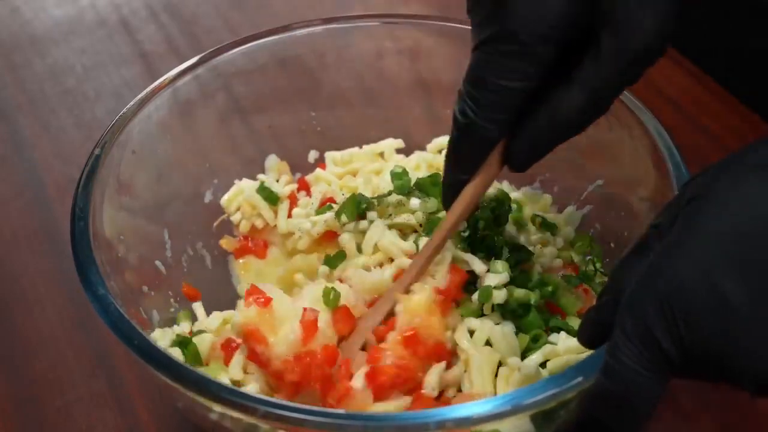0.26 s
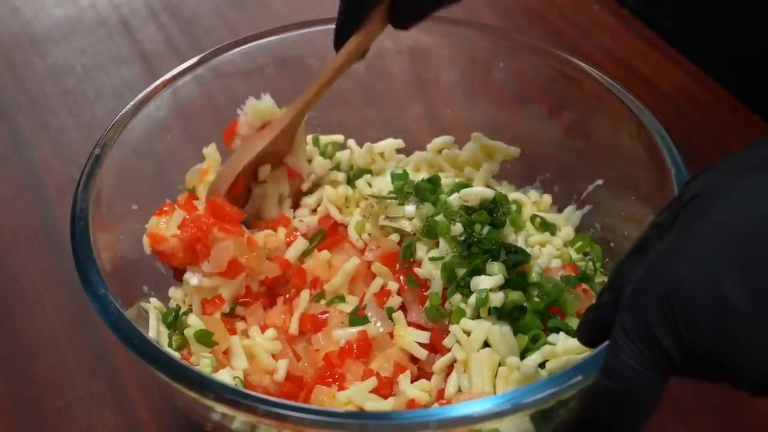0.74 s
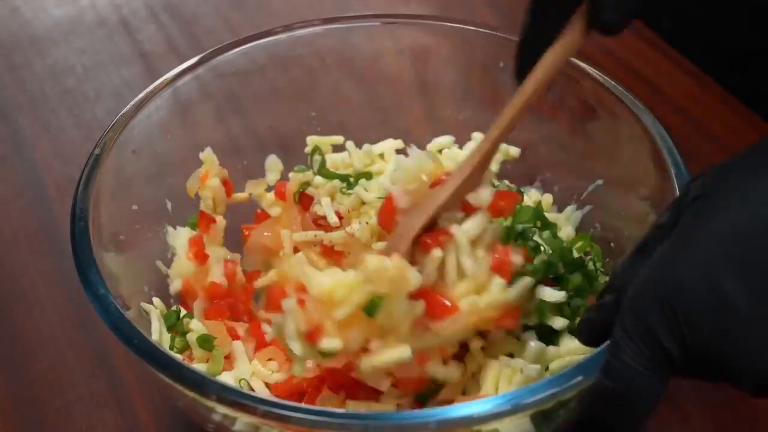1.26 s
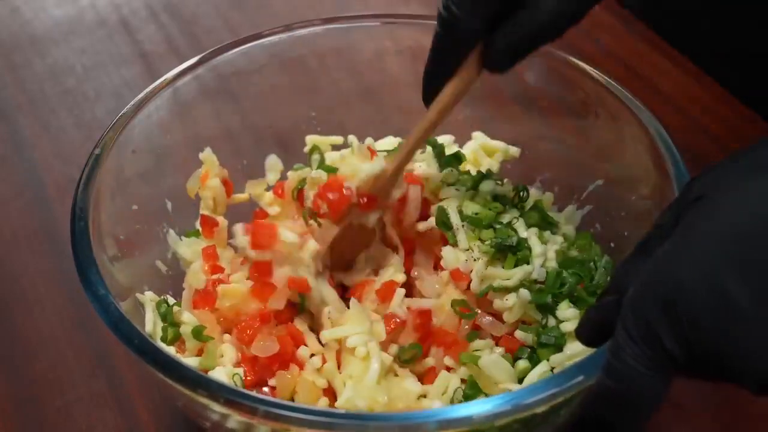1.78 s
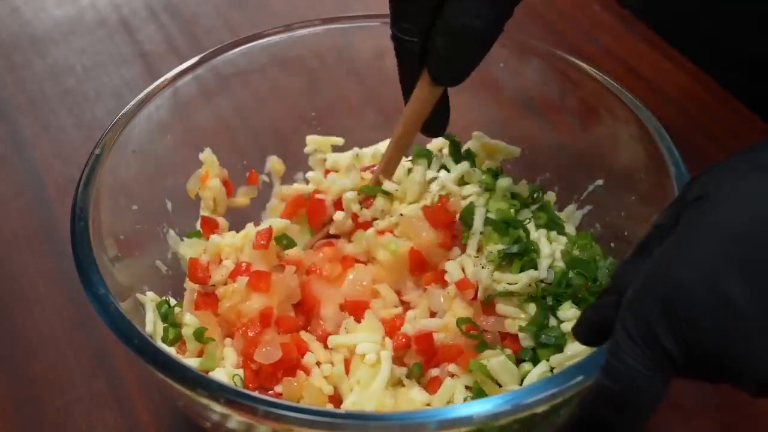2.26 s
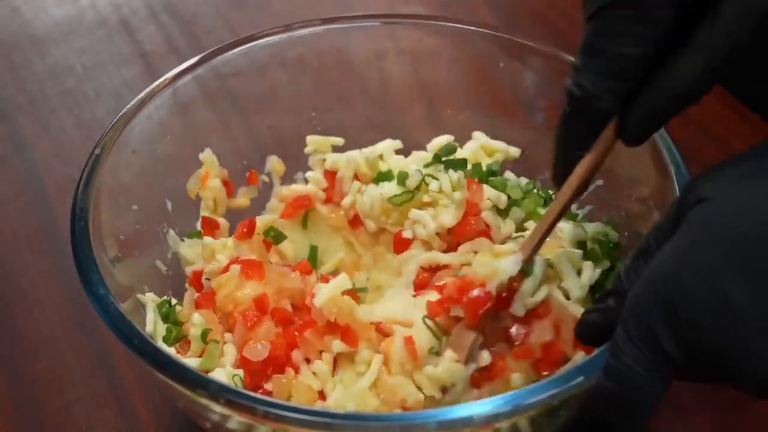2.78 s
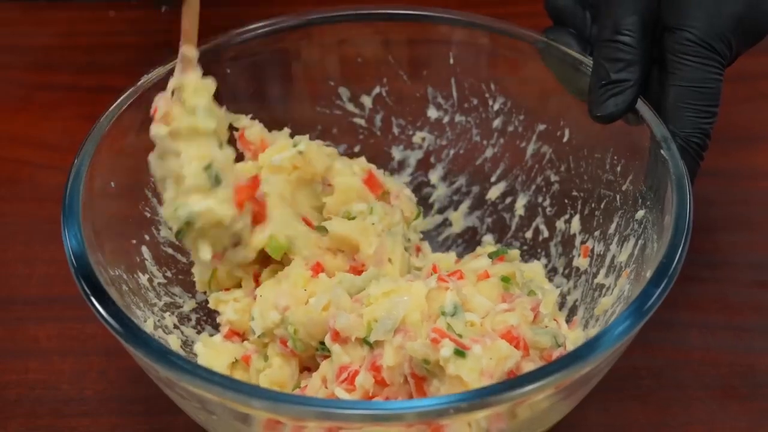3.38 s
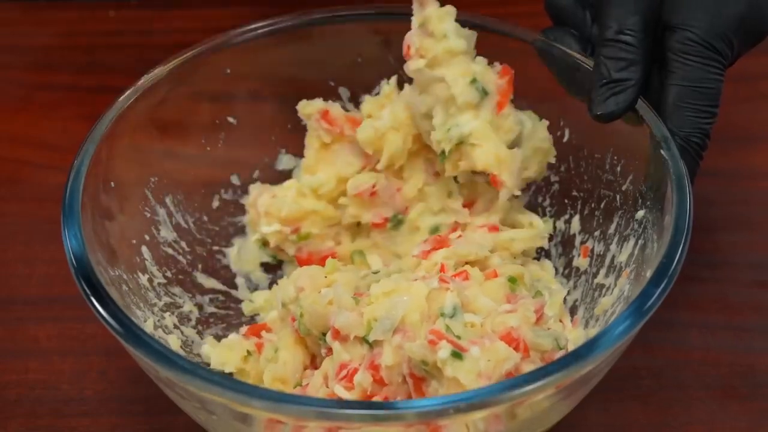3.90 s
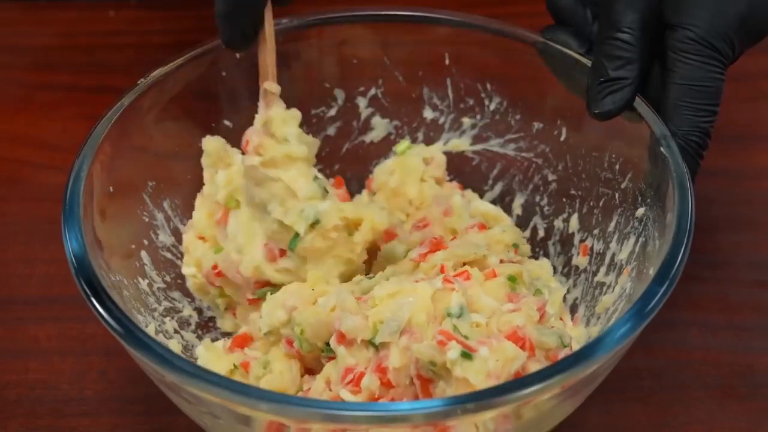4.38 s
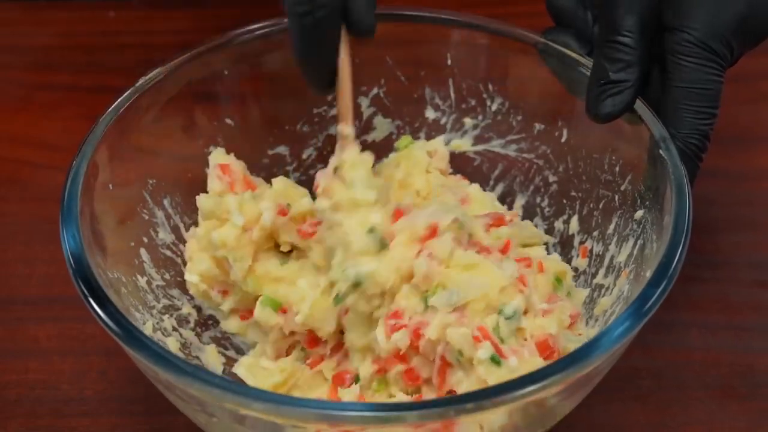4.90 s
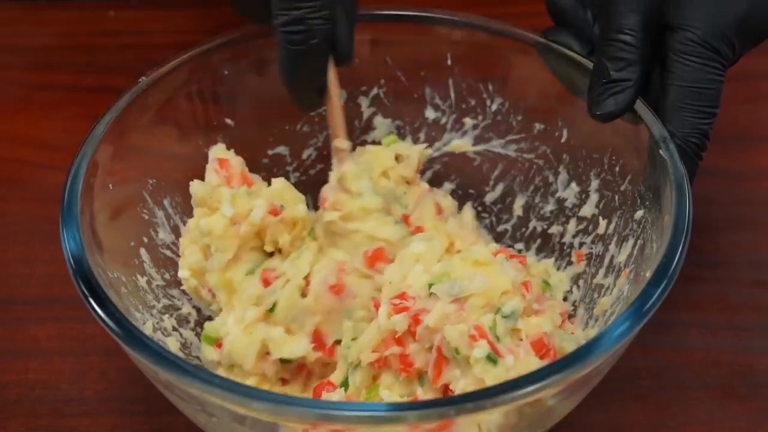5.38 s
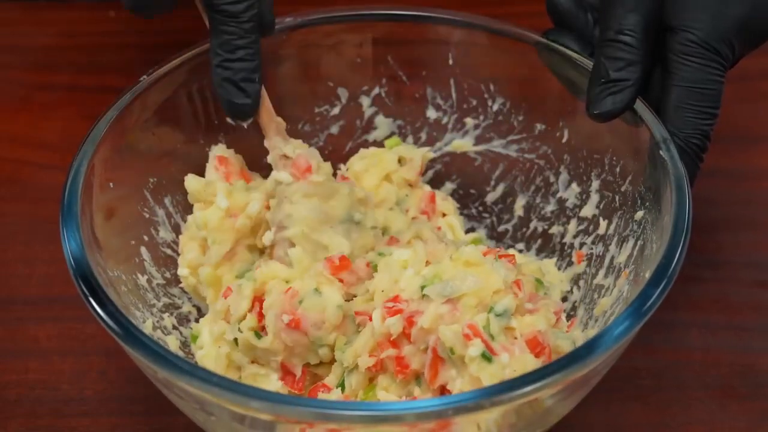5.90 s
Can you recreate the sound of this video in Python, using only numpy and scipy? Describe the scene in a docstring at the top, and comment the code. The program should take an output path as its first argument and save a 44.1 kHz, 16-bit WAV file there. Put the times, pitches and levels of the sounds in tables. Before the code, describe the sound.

Thick, moist food is stirred in a glass bowl with a wooden spoon for about six seconds, heard up close in a quiet room. Uneven strokes squelch and crackle as little air pockets snap open. Occasional low knocks pass through the bowl into the wooden table, the firmest coming after the midpoint. About two thirds through, a brief small squeak of air escapes. The stirring softens at the end, over a faint low rumble.

```python
"""Stirring wet mash in a glass bowl

A wooden spoon turns a thick wet mash in a glass bowl on a wooden table, close to one microphone.
Air pockets and sticky films snap open as short pops over a fine crackle and a lower squelch.
The air in the bowl rings along, the spoon's pushes thump through the bowl into the table,
and once trapped air squeaks out. Under it all lie a faint table rumble and quiet room noise."""
import sys
import numpy as np
from scipy import signal
from scipy.fft import rfft, irfft
from scipy.io import wavfile
from scipy.ndimage import uniform_filter1d

SR = 44100
rng = np.random.default_rng(int(sys.argv[2]) if len(sys.argv) > 2 else 0)


def wav_record(signal):
    """Record a signal, one row per channel, as 16-bit PCM in the file named by sys.argv[1]."""
    frames = np.transpose(np.atleast_2d(signal))
    bounded = np.clip(frames, -1, 1)
    # unit amplitude maps onto the largest positive 16-bit level
    quanta = np.round(bounded * 32767).astype(np.int16)
    wavfile.write(sys.argv[1], SR, quanta)


N = 270856

# tone colour of the room noise: f/Hz, relative level/dB
ROOM_SPECTRUM = [(15, -34), (25, -3.5), (59, 3.5), (130, -5), (200, -7), (405, -15.5), (700, -20),
                 (1200, -29), (2500, -31), (5000, -28), (9000, -31), (13000, -26.5), (16000, -29)]
# turns of the spoon and the slumping of the mash after them: start t/s, end t/s,
# relative crackle level/dB, brightness/(dB per octave), relative squelch level/dB,
# small pops/(per s), their level/dB
TURNS = [(0.0, 0.14, -58, 25, -50.5, 21.5, -32.5), (0.149, 0.593, -44.5, 0, -39.5, 38.4, -29.5),
         (0.602, 0.81, -57, 2, -52, 23.7, -38), (0.779, 1.295, -42.5, -4.5, -40.5, 47.5, -25.5),
         (1.299, 1.505, -54.5, 2.5, -47.5, 25.8, -31), (1.487, 1.944, -43, -4.5, -42.5, 34.8, -26.5),
         (2.12, 2.634, -43, -6, -42.5, 60, -26), (2.642, 2.77, -66.5, 12, -42, 25.4, -30),
         (2.782, 2.999, -47.5, -6.5, -52, 57, -23), (3.0, 3.291, -45.5, -4, -42, 47, -38),
         (3.464, 3.602, -54.5, 3, -47, 26, -25), (3.603, 3.89, -42.5, -11, -46, 53.5, -24.5),
         (3.892, 4.136, -59.5, 1, -46.5, 26, -29), (4.119, 4.568, -45.5, -4.5, -38, 55, -27),
         (4.683, 4.943, -48, -5.5, -41.5, 44, -28), (4.919, 5.27, -44.5, -3.5, -47, 58.4, -22.5),
         (5.27, 5.477, -51.5, -7, -54.5, 46, -29.5), (5.482, 5.674, -37, -5.5, -36, 55, -26.5),
         (5.7, 6.126, -53, -6, -55, 20.3, -34.5)]
# the spoon squeezes the mash against the glass: middle t/s, half length/s,
# relative crackle level/dB, brightness/(dB per octave), relative squelch level/dB
SQUEEZES = [(0.318, 0.046, -37, -8, -20), (0.97, 0.044, -54, -6, -44), (1.594, 0.051, -40.5, -10.5, -24.5),
            (2.256, 0.036, -44.5, -3, -28), (2.867, 0.054, -42, 2, -31), (3.26, 0.033, -46, 1, -41),
            (3.715, 0.079, -36, -2, -35.5), (4.34, 0.05, -42, 0, -38), (5.003, 0.073, -41.5, -4, -36.5),
            (5.48, 0.079, -47, -1.5, -37)]
# tone colour of the crackle: f/Hz, relative level/dB
CRACKLE_SPECTRUM = [(1060, -34), (1800, -10), (1920, -11.5), (2670, -2.5), (3840, 2.5), (8130, 11.5),
                    (14100, -4.5), (16000, 12.5)]
# the loudest pops: t/s, f/Hz, level/dB, body f/Hz, body level/dB, snap level/dB
LOUD_POPS = [(0.0408, 8900, -24, 1430, -46, -33), (0.0749, 8300, -23, 1810.0, -43.0, -25.0),
             (0.1084, 8230.0, -20, 1800.0, -42, -30), (0.1539, 8990.0, -34, 1500.0, -52.0, -27),
             (0.1667, 3400, -24.5, 1230, -35, -48), (0.1798, 6830.0, -8, 1170, -39.5, -15.0),
             (0.2279, 2570.0, -21.5, 1310.0, -33, -23), (0.2469, 2070, -26, 1890, -28, -45),
             (0.2806, 1850.0, -16, 1900, -24, -19), (0.3106, 2280, -16, 610, -24.5, -34),
             (0.3287, 8910.0, -26, 1250, -24.0, -17), (0.3466, 2940, -19.5, 1420, -28, -42),
             (0.3735, 2850, -22, 1370, -28, -45), (0.3991, 7020.0, -19, 1320.0, -33, -27.0),
             (0.4473, 8700.0, -30, 1270.0, -50, -32), (0.4694, 5230.0, -23, 1280.0, -34, -24),
             (0.513, 5440.0, -22, 1070, -35.0, -29.0), (0.5501, 4870.0, -21.5, 1130.0, -25.5, -28),
             (0.7261, 8990.0, -23, 1250.0, -45, -27), (0.7415, 8990.0, -26, 1260.0, -50, -25),
             (0.7461, 8990.0, -30.0, 1250.0, -51, -30.0), (0.7758, 3960, -29, 1250, -40, -48),
             (0.8058, 7350, -19.0, 1210.0, -44, -40.0), (0.8179, 2600, -15.0, 1240, -26, -41),
             (0.8331, 2730, -26, 1280, -31, -41), (0.8576, 2160, -24, 1890, -36, -45),
             (0.873, 7000, -14, 1280.0, -34, -42), (0.8843, 3220, -8.5, 1370.0, -24.0, -35),
             (0.912, 2470, -10.0, 1210.0, -27, -23), (0.9452, 2440.0, -13.5, 1300.0, -24, -38),
             (0.9515, 4170.0, -18, 1290.0, -31.0, -31.0), (0.9562, 2720, -24, 1800, -31, -42),
             (1.0176, 2150, -20.5, 1270, -32, -31.0), (1.0291, 3100, -27, 1180, -45, -38),
             (1.084, 6560, -18.0, 1150, -25.0, -26), (1.088, 5210, -23, 750, -30, -38),
             (1.1001, 6150.0, -17.0, 1110, -26, -23), (1.1257, 5790.0, -17, 1040.0, -35, -19),
             (1.1448, 8230, -13, 1260.0, -36.0, -28), (1.1618, 5245, -20, 1270.0, -42.0, -31.0),
             (1.1725, 6980.0, -22.0, 1220.0, -43.0, -32.0), (1.1939, 8620.0, -30, 1300, -33, -19.0),
             (1.2082, 4540, -22.5, 810.0, -51, -39.0), (1.2288, 6170.0, -19.0, 1250.0, -49, -37.0),
             (1.4803, 8990.0, -30, 1220.0, -46.0, -29.0), (1.4961, 2370, -30, 1370, -31, -44),
             (1.5268, 5990.0, -29, 1300.0, -37, -30), (1.5458, 1850, -27, 1380, -26, -39),
             (1.5624, 4900, -24, 1260, -27, -41), (1.5825, 1850, -25, 1320, -23, -40),
             (1.6003, 1860, -24, 1360, -10, -28), (1.6086, 2640.0, -19, 1230.0, -25, -33.0),
             (1.6226, 1870, -24, 1790.0, -32, -31.0), (1.7012, 6870.0, -23, 1170, -31, -38.0),
             (1.7124, 6740.0, -21, 1270, -38, -22), (1.732, 1850.0, -21, 1490, -29, -26),
             (1.7577, 1880, -18, 1370, -26, -19), (1.7937, 2480, -27, 1400, -32, -40),
             (1.816, 7750, -8, 1300, -39, -21), (1.8423, 5290, -23, 1310.0, -35.0, -29),
             (1.8604, 7100, -21, 1130.0, -38, -12.5), (1.8731, 2800.0, -24, 1380.0, -30.0, -26),
             (1.8902, 8040.0, -22, 1460.0, -41.0, -18), (1.9412, 4560, -29, 1170.0, -50, -28),
             (1.9514, 8760.0, -26, 1890.0, -55, -19), (1.9748, 8990.0, -29, 1040.0, -62.0, -31),
             (2.1364, 7030, -33, 1140, -38, -46), (2.19, 5300, -9, 1892, -25, -22),
             (2.2003, 4900, -17, 1220, -38.0, -36), (2.2236, 6020.0, -13, 1367, -42, -38.0),
             (2.2372, 6900, -18, 1290, -18, -30), (2.2576, 3100, -11.5, 1210.0, -18.5, -25.0),
             (2.266, 2400.0, -24.0, 1200, -37, -25.0), (2.3005, 1850, -27, 1900, -35, -37),
             (2.3072, 1916, -28, 1142, -39, -23), (2.3194, 7310.0, -13, 1250.0, -30, -13),
             (2.3429, 8990.0, -17, 1340.0, -34.0, -23.0), (2.352, 3400.0, -18.5, 1778, -27, -28),
             (2.3738, 1850, -26, 1250, -27, -27), (2.3789, 4890, -17, 1132, -28, -19),
             (2.3912, 8010.0, -17, 810.0, -35.0, -14), (2.4144, 4960, -17.5, 710, -26.5, -20),
             (2.4683, 4450.0, -21.0, 1140, -28, -23), (2.4827, 4575, -19, 1170, -30.5, -11),
             (2.5095, 4810.0, -23, 1120.0, -29, -21), (2.5273, 4670.0, -16.5, 1126, -33, -16),
             (2.5446, 7000, -13.5, 754, -40, -18), (2.5746, 6740, -32, 1030.0, -56, -29),
             (2.5979, 7860, -34, 1291, -50, -13), (2.6214, 6740.0, -18, 1140.0, -41, -34),
             (2.6337, 8990.0, -29.0, 1210.0, -43.0, -26.0), (2.6743, 1843, -42, 1220, -31, -51),
             (2.7523, 4460.0, -31.0, 1254, -34.0, -31), (2.7763, 8990.0, -37.0, 1870.0, -51.0, -20),
             (2.7842, 3840, -18.5, 1250.0, -23, -28), (2.8206, 1850, -31, 1230, -31, -38),
             (2.8353, 1855, -23, 1300.0, -24, -35.0), (2.8571, 1880, -23, 1250, -36, -29.0),
             (2.8737, 6490, -13, 1280.0, -32.0, -26), (2.9001, 6240.0, -24.0, 1420.0, -38, -22),
             (2.9042, 4270, -18, 1339, -26, -29), (2.9303, 8300.0, -22, 1170.0, -47, -25.0),
             (2.9396, 1850, -24, 1180, -28, -43), (2.957, 6840.0, -14, 1890.0, -40.0, -25),
             (2.9622, 6890.0, -17, 1340.0, -37, -21.0), (2.9721, 5850.0, -21, 1890.0, -34, -24.0),
             (2.9781, 5600.0, -28, 1170.0, -44.0, -19), (2.9954, 8900, -26, 1796, -44, -22),
             (3.0094, 8690.0, -22.0, 1250.0, -39, -11.5), (3.0156, 5450.0, -23.0, 1110.0, -45, -25.0),
             (3.0445, 5170, -20, 1230.0, -48, -24.0), (3.0595, 5840, -12.5, 1200.0, -55, -24),
             (3.0675, 7670.0, -29.0, 656, -51, -27.0), (3.0833, 6920.0, -26, 1710.0, -49, -33.0),
             (3.0971, 4810.0, -21, 712, -34, -23), (3.1076, 3500.0, -29, 670.0, -39, -19),
             (3.131, 5020, -21, 1220.0, -40, -35.0), (3.142, 4640.0, -18, 1670.0, -31, -33),
             (3.1605, 6370, -31, 810.0, -43.0, -21), (3.1763, 6200.0, -12, 1210.0, -34, -15),
             (3.1862, 6260.0, -12, 1240.0, -38, -28.0), (3.1966, 5290.0, -19, 775, -35, -32.0),
             (3.2082, 6220.0, -5, 1420, -32, -29), (3.2136, 3730, -16, 1480, -26, -32),
             (3.2316, 7480.0, -7.5, 810.0, -27.0, -33), (3.2726, 5600, -11, 1200.0, -26.5, -21),
             (3.4962, 7190, -10, 1660.0, -42, -25), (3.5042, 2206, -15.5, 797, -17.5, -32),
             (3.6, 5290.0, -17, 1563, -35.0, -22), (3.6181, 5500, -11.5, 660.0, -45, -24.0),
             (3.6488, 2830.0, -13.5, 1680, -28, -34.0), (3.6624, 5400, -8, 1680.0, -33, -33.0),
             (3.6834, 5000.0, -13, 1710.0, -22, -29.0), (3.6885, 2920, -16, 1540, -27, -25),
             (3.6953, 1980, -19, 1680, -29, -23.0), (3.7027, 1850.0, -22, 1630, -24, -33.0),
             (3.7087, 7200.0, -19, 1040, -30.0, -25.0), (3.7235, 2700, -15.0, 1090, -25, -33.0),
             (3.7345, 3190.0, -13, 1120, -25, -29.0), (3.7393, 6060.0, -14, 1710.0, -26, -16),
             (3.7449, 5420, -15, 1072, -29, -20), (3.75, 5250.0, -7, 1570.0, -21, -29.0),
             (3.7615, 8400.0, -9, 1080.0, -36, -10), (3.7663, 2760, -17, 1610.0, -31, -30.0),
             (3.7868, 6590, -19, 1650.0, -35, -14), (3.8111, 8990.0, -14, 1660, -25.5, -16),
             (3.8256, 7250.0, -7.5, 1200.0, -38.0, -31.0), (3.8344, 8990.0, -24, 747, -30.0, -18.0),
             (3.8506, 6800.0, -9.5, 1110.0, -33.0, -24), (3.8629, 6530, -17, 1100.0, -31, -32.0),
             (3.8784, 8690.0, -28.0, 1250.0, -39.0, -21), (3.8941, 6830, -28, 1260.0, -39.0, -23.5),
             (3.9337, 3540, -31, 1890, -46.0, -31), (3.9645, 3380, -27.5, 1656, -40, -26),
             (4.0127, 4600, -26.5, 1070.0, -52, -26), (4.0412, 3480, -28, 1640.0, -45.0, -28),
             (4.1083, 7800, -23, 720.0, -46, -29), (4.1609, 6670, -26, 940.0, -45.0, -20.5),
             (4.1812, 4910, -14, 1158, -32, -22.5), (4.2092, 8650, -21, 1090.0, -40.0, -19),
             (4.2179, 5720.0, -22, 1263, -38, -24.0), (4.2524, 5960, -17.0, 920.0, -34, -22),
             (4.2613, 5240.0, -11.5, 790.0, -29.5, -33), (4.2691, 3170.0, -24, 770, -28, -34),
             (4.3085, 3740.0, -18, 750, -30, -20), (4.3166, 4860, -15, 710, -30.5, -36.0),
             (4.33, 8990.0, -12, 670.0, -31, -22), (4.364, 6720, -13, 1896, -32, -15.5),
             (4.3719, 7500.0, -20.0, 1290.0, -37, -22), (4.3771, 1900, -21, 1370, -32, -19),
             (4.385, 1850, -28, 1194, -25.5, -42), (4.3987, 7780.0, -10, 1310.0, -32, -28),
             (4.4117, 1880, -23, 1830, -31, -30), (4.4281, 2760, -17, 1320.0, -28, -21),
             (4.4339, 7070.0, -16, 1280, -25, -30.0), (4.4671, 1860, -21, 1330, -23, -20),
             (4.4732, 1850.0, -21, 1372, -33, -18), (4.48, 3865, -17.0, 1460.0, -35, -20),
             (4.4979, 2890.0, -13.0, 1780.0, -24, -40.0), (4.5095, 2800, -19, 815, -27.5, -21),
             (4.5199, 4630.0, -14, 1000, -39, -25), (4.5342, 8140.0, -18, 1383, -43, -23),
             (4.5804, 4750, -26.5, 1100.0, -50, -26), (4.6083, 3350, -19.5, 1670, -36, -28),
             (4.6183, 3240.0, -31.0, 1130.0, -50, -25), (4.6741, 8770, -18.5, 1287, -49, -20),
             (4.7009, 3260.0, -30.5, 1713, -46, -29), (4.7316, 2730, -26, 1760, -39, -35.0),
             (4.746, 3270, -19, 1180.0, -37, -18), (4.7865, 5300, -16, 880.0, -46, -35),
             (4.794, 2890, -26.0, 1790.0, -36.0, -27), (4.8029, 1900, -29, 1810, -39, -38),
             (4.8214, 1860, -27, 1770.0, -39, -48.0), (4.828, 3070, -23.5, 1230.0, -37.0, -34),
             (4.8509, 6740, -22.0, 1735, -34, -32.0), (4.8815, 8990.0, -17.5, 1730, -29, -20),
             (4.895, 4646, -20, 1200.0, -40.0, -42.0), (4.9206, 4574, -23, 1796, -41.0, -30),
             (4.9481, 7000, -11, 1222, -27.5, -31.0), (4.976, 3630.0, -13, 1120, -27.0, -32.0),
             (4.9805, 6580, -10, 1080.0, -26.0, -29.0), (4.9931, 8720.0, -22, 1315, -41.0, -21),
             (5.0124, 6800, -6, 1120, -26, -26.0), (5.0175, 5820, -9, 1060.0, -23.0, -29),
             (5.0288, 2787, -17, 1020, -29, -21), (5.0631, 2560, -22, 1080, -27.5, -39),
             (5.1031, 2665, -18.5, 660.0, -45, -35.0), (5.1101, 2754, -25, 700.0, -43, -31),
             (5.1326, 2520, -26.5, 668, -42, -39), (5.1549, 2380, -29, 1890, -50, -30),
             (5.181, 5540, -20, 1262, -47, -33), (5.2024, 3120, -31, 1340, -36, -28),
             (5.244, 3190, -27, 1280, -46, -42), (5.2523, 3150.0, -13.0, 1897, -26, -39),
             (5.3407, 3660.0, -22, 1250.0, -31.5, -32.0), (5.361, 6874, -16, 1503, -40, -43),
             (5.3898, 5000, -23, 1230.0, -36.0, -38.0), (5.4075, 7500.0, -23, 1264, -49.0, -24),
             (5.4848, 4550.0, -9.5, 760.0, -34, -26.0), (5.4897, 3370, -11.5, 680.0, -33.5, -31.0),
             (5.5397, 8320.0, -22, 1370.0, -36, -21), (5.5495, 4090, -22, 790.0, -36, -30.0),
             (5.5872, 8040, -23, 1100.0, -34.0, -28), (5.6014, 7820.0, -8, 1340, -24, -18),
             (5.6173, 5890, -18, 873, -41.0, -19.0), (5.6369, 7620.0, -20.0, 910, -33, -25.0),
             (5.6434, 4500, -19, 1320.0, -29, -23.0), (5.658, 5700.0, -23.0, 1105, -34, -21),
             (5.9185, 9000, -25, 1290.0, -47, -29), (6.0525, 3016, -22.0, 1097, -32.5, -44.0),
             (6.0672, 6120.0, -31, 1266, -57.0, -45.0), (6.1092, 8300, -32, 1100.0, -49, -38)]
# the spoon knocks on the glass: t/s, blow level/dB, contact time/s
KNOCKS = [(0.31, -20.5, 0.005), (1.599, -26.5, 0.0039), (2.237, -30, 0.00076), (2.268, -25.5, 0.00037),
          (2.415, -53, 0.0019), (3.2242, -13, 0.0011), (3.5031, -12, 0.0012), (4.24, -36, 0.0011),
          (4.503, -10.5, 0.0021), (5.682, -28, 0.0049)]
# notes at which bowl and table top ring: f/Hz, relative level/dB, time to fade by 60 dB/s
TABLE_NOTES = [(81.3, -13, 0.23), (133, -29, 0.28), (195, -4.5, 0.031), (188.7, -21, 0.51),
               (267, -7.5, 0.026), (480, -8.5, 0.044), (790, -35, 0.028), (1080, -20, 0.058)]
# pushes that rock the table on its legs: t/s, level/dB
SWAYS = [(0.94, -31), (1.6077, -30), (2.2635, -23.5), (2.843, -33), (3.2355, -26), (3.5089, -25),
         (4.244, -32.5), (4.5, -19.5), (5.6774, -23.5)]
# air squeezed out of the mash: t/s, f/Hz, relative level/dB
SQUEAK_CURVE = [(4.232, 1250, -41), (4.243, 1048, -24), (4.255, 878, -30), (4.264, 790, -27),
                (4.281, 801, -27), (4.293, 962, -30), (4.305, 821, -27), (4.317, 710, -21),
                (4.335, 650, -29), (4.348, 647, -46)]
# the tones in the squeak: multiple of its pitch, relative level/dB
SQUEAK_HARMONICS = [(1, -10), (2, -16.5), (3, -25)]


def from_db(db):
    """Turn a level in dB into a factor to multiply by."""
    return 10 ** (np.asarray(db) / 20)


def rms_one(x):
    """Scale a signal so that its average strength (rms) is 1."""
    return x / np.sqrt(np.mean(x ** 2) + 1e-20)


def level_at(spectrum, hz):
    """Read a level between the rows of a spectrum, with octaves evenly spaced."""
    row_hz, row_db = np.transpose(spectrum)
    return np.interp(np.log(hz), np.log(row_hz), row_db)


def ring(force, hz, t60):
    """Each push starts a pure tone that fades by 60 dB in t60 seconds."""
    decay, angle = from_db(-60 / (t60 * SR)), 2 * np.pi * hz / SR
    return signal.lfilter([0, np.sin(angle)], [1, -2 * decay * np.cos(angle), decay ** 2], force + 1e-18)


def burst(hz, cycles, t):
    """A tone that swells for a moment and dies within a few cycles."""
    age = t * hz / cycles * 6
    return age * np.exp(1 - age) * np.cos(2 * np.pi * hz * t)


def grains(pitches, levels_db, per_s, spread_db, smear_db, cycles):
    """Random bursts of uneven size over a wet smear of far smaller ones, each at one of the pitches."""
    sizes = from_db(spread_db * np.minimum(rng.exponential(1, N), 2)) * rng.choice([-1, 1], N)
    clicks = sizes * (rng.random(N) < per_s / SR) + from_db(smear_db) * rng.standard_normal(N)
    which_pitch = rng.integers(0, len(pitches), N)
    sound = np.zeros(N)
    for k, (hz, db) in enumerate(zip(pitches, levels_db)):
        t = np.arange(round(2 * cycles * SR / hz)) / SR
        sound += signal.oaconvolve(from_db(db) * clicks * (which_pitch == k), burst(hz, cycles, t))[:N]
    return rms_one(sound)


def room_noise(level_db=-51):
    """The steady, mostly deep hush of the room."""
    hz = np.maximum(np.fft.rfftfreq(N, 1 / SR), 1)
    colour = from_db(level_at(ROOM_SPECTRUM, hz)) * (hz > 18)
    return from_db(level_db) * rms_one(irfft(rfft(rng.standard_normal(N)) * colour, N))


def table_rumble(level_db=-48, swing_db=1):
    """The unsteady pressure of the holding hand shakes the table's legs."""
    unsteady = rms_one(uniform_filter1d(uniform_filter1d(rng.standard_normal(N), 3000), 3000))
    shake = rng.standard_normal(N)
    legs = ring(shake, hz=42.2, t60=0.063)
    legs += from_db(-13.5) * ring(shake, hz=91, t60=0.15)
    legs += from_db(-17.5) * ring(shake, hz=128, t60=0.27)
    return from_db(level_db + swing_db * unsteady) * rms_one(legs)


def stirring(rise_s=0.052, fall_s=0.056):
    """How strong and bright the mash sounds: turns rise, hold and fall; squeezes add short surges."""
    t = np.arange(N) / SR
    moves = []
    for start, end, *levels, _, _ in TURNS:
        shape = np.clip(np.minimum((t - start) / rise_s, (end - t) / fall_s) + .5, 0, 1)
        moves.append((shape, *levels))
    for middle, half_s, *levels in SQUEEZES:
        moves.append((np.exp(-((t - middle) / half_s) ** 2), *levels))
    crackle_gain, squelch_gain, brightness = from_db(-69.5), from_db(-64), 0   # spoon lifted clear
    for shape, crackle_db, tilt, squelch_db in moves:
        crackle_gain += from_db(crackle_db) * shape
        squelch_gain += from_db(squelch_db) * shape
        brightness += tilt * shape
    return crackle_gain, squelch_gain, brightness


def crackle(gain, brightness):
    """Tiny films tear with a fine crackle; brightness tips it up or down by at most 9 dB per octave."""
    pitches = np.geomspace(1900, 15500, 14)
    tilt = np.clip(brightness, -9, 9)
    # high bursts are shorter, so the middle term makes them taller
    levels_db = [level_at(CRACKLE_SPECTRUM, hz) + 20 * np.log10(hz) + tilt * np.log2(hz / 6000)
                 for hz in pitches]
    films = grains(pitches, levels_db, per_s=2500, spread_db=14.2, smear_db=-5, cycles=4.8)
    return from_db(1.33) * gain * films


def squelch(gain, air_hz=1374, air_width_hz=170, hollow_hz=545, hollow_width_hz=235):
    """Larger pockets sound lower, lifted near the notes of the bowl's air and the spoon's hollow."""
    pitches = np.geomspace(280, 2000, 11)
    air_db = 7 / (1 + ((pitches - air_hz) / air_width_hz) ** 2)
    hollow_db = 6 / (1 + ((pitches - hollow_hz) / hollow_width_hz) ** 2)
    levels_db = 8.24 * np.log2(pitches / 1000) + air_db + hollow_db
    pockets = grains(pitches, levels_db, per_s=600, spread_db=1.5, smear_db=-27, cycles=5)
    return from_db(-11.5) * gain * pockets


def small_pops(most=60):
    """Small pockets burst at random in every turn; gives rows like those of LOUD_POPS."""
    rows = []
    for start, end, *_, per_s, level_db in TURNS:
        place, pitch, body = rng.random((3, most))
        size, body_size, snap_size = rng.standard_normal((3, most))
        times = start + (np.arange(most) + place) / per_s
        hz, body_hz = 2500 * 3.6 ** pitch, 1000 * 2.12 ** body
        db = level_db + size
        body_db, snap_db = db - 21 + 6 * body_size, db - 10 + 6 * snap_size
        rows += list(np.transpose([times, hz, db, body_hz, body_db, snap_db])[times < end])
    return rows


def pops(tear_t60=0.013):
    """A pocket bursts: a short tone, a low body and a thin high snap; the film tears around it."""
    length, lead = 640, 70   # samples in a tear, and before its main click
    t = np.arange(length) / SR
    tear_shape = from_db(np.where(t < lead / SR, -20, -13 - 60 * (t - lead / SR) / tear_t60))
    sound = np.zeros(lead + N + length)
    for s, hz, db, body_hz, body_db, snap_db in list(LOUD_POPS) + small_pops():
        direction, snap_pitch = rng.standard_normal(2)
        snap_hz = np.clip(11000 * from_db(1.73 * snap_pitch), 8500, 15000)
        pop = from_db(db) * burst(hz, 3.12, t)
        pop += from_db(body_db) * burst(body_hz, 5.45, t)
        pop += from_db(snap_db) * burst(snap_hz, 6.5, t)
        noise = rng.standard_normal(length)
        clicks = noise * (np.abs(noise) > 2.3) * tear_shape   # a few small clicks around the main one
        clicks[lead] = np.sign(direction)
        start = round((s - .0003) * SR)
        sound[start:start + length] += np.convolve(clicks, pop[:260])[:length]
    return sound[lead:lead + N]


def bowl_ring(sound, tail_db=-37.5, tail_t60=0.14):
    """Adds the ring of the air in the bowl and a faint short echo of glass and kitchen."""
    t = np.arange(SR // 4) / SR
    echo = from_db(tail_db - 60 * t / tail_t60) * rng.standard_normal(len(t)) * (t > .001)
    echo[0] = 1   # the direct sound
    return signal.fftconvolve(sound, echo)[:N] + from_db(-48.5) * ring(sound, hz=1230, t60=0.05)


def spoon_thumps(wood_db=-16, wood_t60=0.36):
    """Each knock is a smooth push on bowl and table, so soft ones wake only the low notes."""
    force, t = np.zeros(N), np.arange(SR // 4) / SR
    for s, db, contact_s in KNOCKS:
        push = np.hanning(round(contact_s * SR) + 2)
        start = round(s * SR)
        force[start:start + len(push)] += from_db(db) * push / push.sum()
    notes = sum(from_db(db) * ring(force, hz, t60) for hz, db, t60 in TABLE_NOTES)
    band = signal.butter(2, [100, 900], "band", fs=SR, output="sos")
    wood = rms_one(signal.sosfilt(band, rng.standard_normal(len(t))))   # many weak notes close together
    return notes + signal.oaconvolve(force, wood * from_db(wood_db - 60 * t / wood_t60))[:N]


def table_sway():
    """The table rocks briefly on its legs after a push."""
    pushes = np.zeros(N)
    for s, db in SWAYS:
        pushes[round(s * SR)] = -from_db(db)
    return signal.oaconvolve(pushes, burst(hz=42.2, cycles=4.44, t=np.arange(SR // 4) / SR))[:N]


def air_squeak(fade_s=0.0068):
    """Escaping air makes a wet slit flutter: a tone whose pitch and level waver."""
    t = np.arange(N) / SR
    times, *curves = np.transpose(SQUEAK_CURVE)
    hz, level_db = (np.interp(t, times, curve) for curve in curves)
    fade = np.clip(np.minimum(t - times[0], times[-1] - t) / fade_s, 0, 1)
    flutter, waver = (rms_one(uniform_filter1d(rng.standard_normal(N), 200)) for _ in range(2))
    phase = 2 * np.pi * np.cumsum(hz * (1 + .035 * waver)) / SR
    tone = sum(from_db(db) * np.sin(k * phase) for k, db in SQUEAK_HARMONICS)
    return np.sqrt(2) * fade * from_db(level_db + 1.55 * flutter) * tone


def scene():
    """Everything reaches one microphone, heard alike on both sides."""
    crackle_gain, squelch_gain, brightness = stirring()
    mash = pops() + crackle(crackle_gain, brightness) + squelch(squelch_gain) + air_squeak()
    mono = bowl_ring(mash) + table_rumble() + spoon_thumps() + table_sway() + room_noise()
    return np.stack([mono, mono])


def record(dry, lowest_hz=24, ceiling=0.38, highest_hz=16600):
    """The microphone loses the deepest bass, loud peaks are rounded and the highest treble is cut."""
    picked_up = signal.sosfilt(signal.butter(2, lowest_hz, "high", fs=SR, output="sos"), dry)
    rounded = ceiling * np.tanh(picked_up / ceiling)
    return signal.sosfilt(signal.cheby2(14, 75, highest_hz, fs=SR, output="sos"), rounded)


dry = scene()
out = record(dry)
wav_record(out)
```